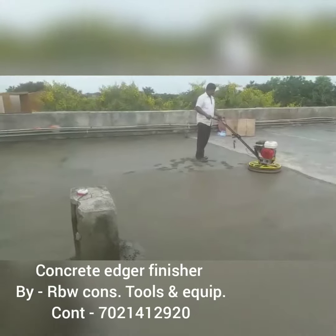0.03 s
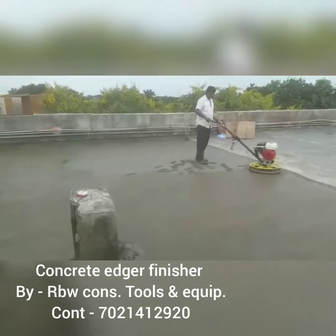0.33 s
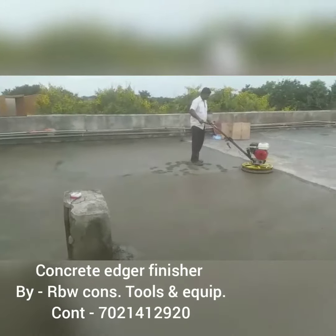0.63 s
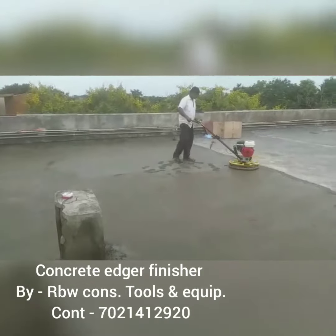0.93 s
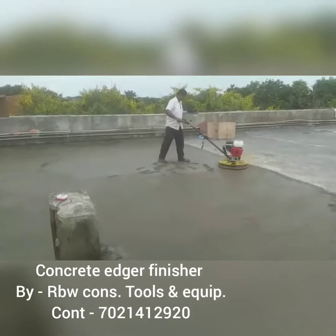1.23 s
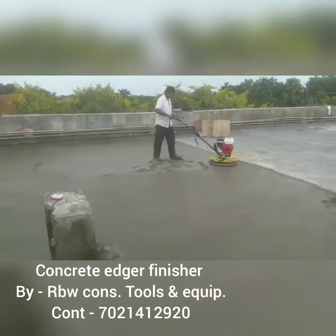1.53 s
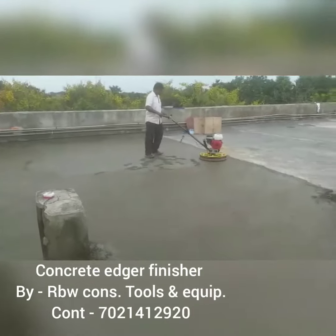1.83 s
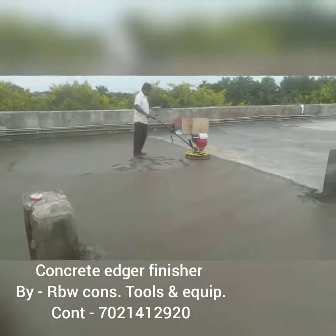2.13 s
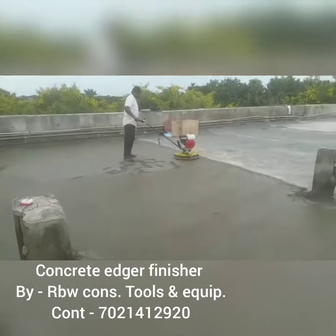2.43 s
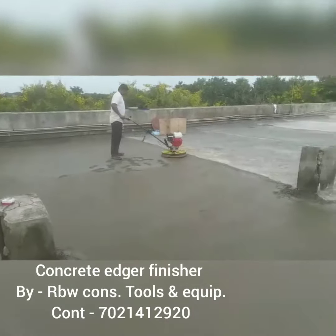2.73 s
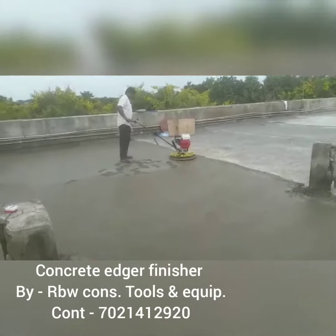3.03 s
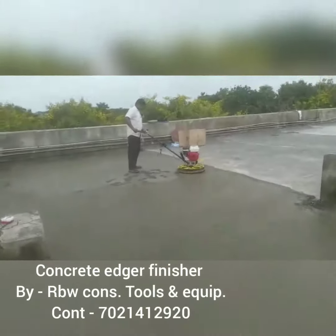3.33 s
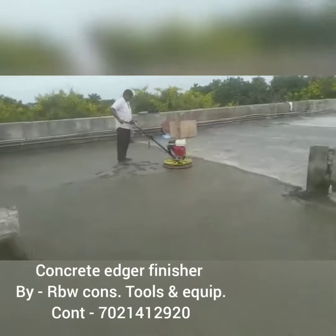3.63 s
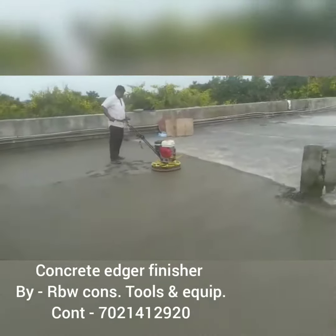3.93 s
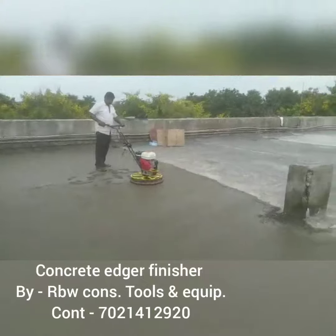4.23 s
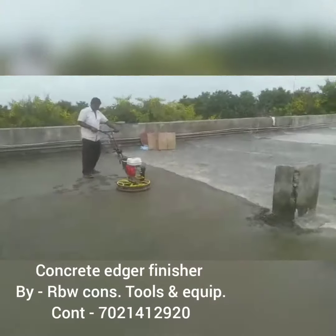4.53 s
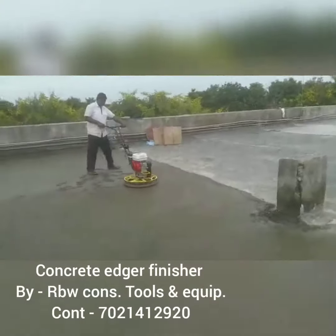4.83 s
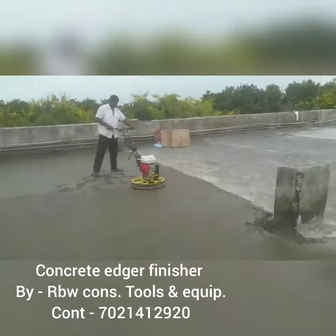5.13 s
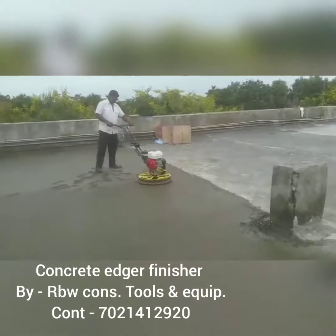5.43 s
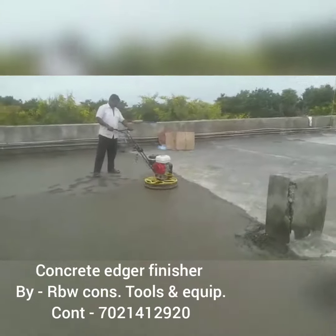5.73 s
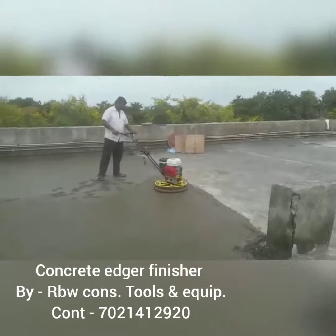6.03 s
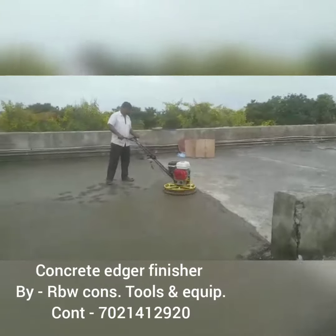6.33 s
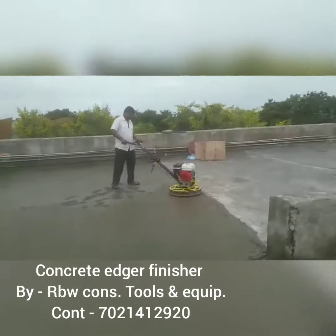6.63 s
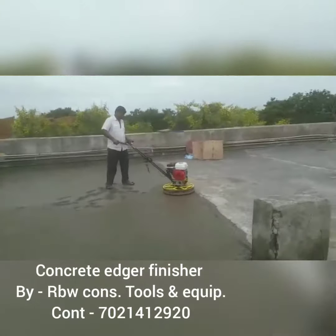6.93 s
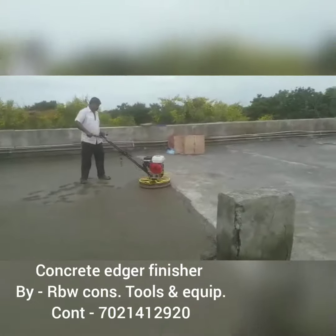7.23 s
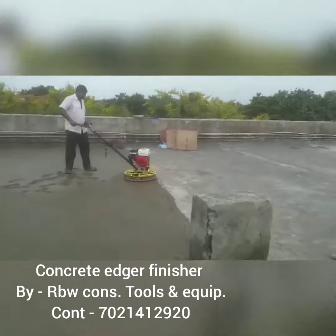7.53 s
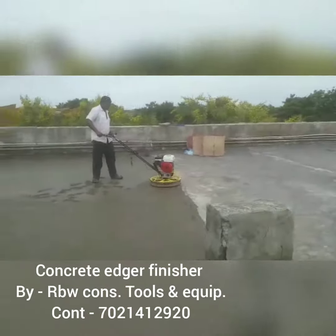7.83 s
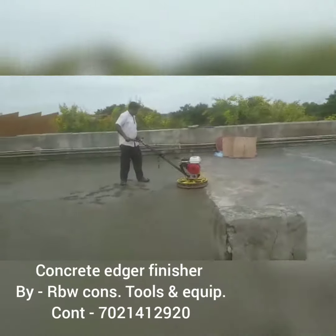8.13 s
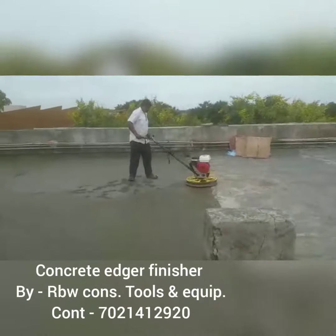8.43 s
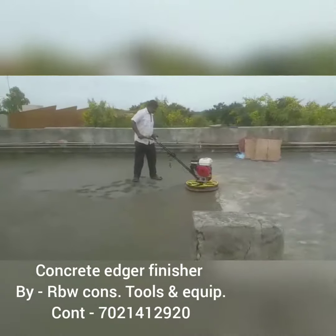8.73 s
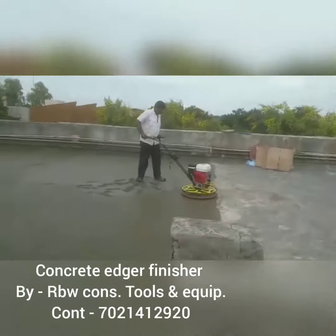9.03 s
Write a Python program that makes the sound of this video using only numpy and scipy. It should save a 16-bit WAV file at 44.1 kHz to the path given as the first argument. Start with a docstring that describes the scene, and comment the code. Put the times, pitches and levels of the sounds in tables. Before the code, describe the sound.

The fast, even thudding of a one-cylinder engine carries across an open rooftop as a power trowel smooths wet concrete a few metres away. Over it comes a continuous sandy grinding and wet hiss from the spinning steel pan. Clusters of small metallic knocks come early, thin out in the middle, then return more thickly before the machine eases slightly. Low walls add a slight reflection.

```python
"""A wet concrete roof with low walls; a walk-behind power trowel works a few metres away.
Its one-cylinder four-stroke engine thuds about 25 times a second, barks harder under load, taps its
casing and rumbles the frame. The steel pan grinds and rings on grit, hisses on the paste and knocks on
stones or the slab's edge. The walls return the thuds; the slab reflects the other sounds."""
import sys
import numpy as np
from scipy import signal
from scipy.fft import rfft, irfft
from scipy.io import wavfile

SR = 44100
rng = np.random.default_rng(int(sys.argv[2]) if len(sys.argv) > 2 else 0)


def dump_mix(stems):
    """Bounce the given channels to the path in sys.argv[1] as a 16-bit WAV at rate SR."""
    frames = np.atleast_2d(stems).T  # one column per channel
    limited = np.clip(frames, -1, 1)  # hard clip at full scale
    pcm = np.round(limited * 32767).astype(np.int16)
    wavfile.write(sys.argv[1], SR, pcm)


N = 405719
TIME = np.arange(N) / SR

# pan's rubbing on the slab: t/s, level/dB
RUB_LEVEL = [(0.0, -21.5), (0.3, -20.5), (0.46, -18), (0.62, -17.5), (0.87, -20.5), (1.04, -23.5),
             (1.09, -26), (1.33, -28), (1.71, -28.5), (2.05, -27.5), (2.17, -24.5), (3.48, -24.5),
             (4.84, -22.5), (5.35, -24), (6.12, -20.5), (6.36, -18), (6.67, -20), (6.73, -20.5),
             (7.0, -22.5), (7.33, -24), (7.56, -24), (7.97, -28.5), (8.79, -27), (9.2, -25.5)]
# modes of steel pan and guard: f/Hz, width/Hz, level/dB
PAN_MODES = [(1950, 850, 2.5), (2350, 1160, 5.5), (2903, 310, 11), (2994, 550, 5), (4105, 230, 7.5),
             (4144, 230, 4.5), (4690, 790, -2.5)]
# rasp of fine sand: f/Hz, level/dB
RASP_SPECTRUM = [(1000, -56), (2500, -10.5), (4000, 1.5), (5000, -0.5), (6000, -1), (7200, -7), (8200, -7),
                 (10000, -16), (15000, -47)]


def from_db(db):
    return 10 ** (np.asarray(db) / 20)


def rms_one(x):
    """Scale the channel mean to rms 1."""
    return x / np.sqrt(np.mean(np.atleast_2d(x).mean(axis=0) ** 2) + 1e-20)


def in_time(rows):
    """One per-sample curve for each column after t/s."""
    t_s, *columns = np.transpose(rows)
    return [np.interp(TIME, t_s, column) for column in columns]


def bump(t_s, length_s):
    """Gaussian, peak 1 at t_s."""
    return np.exp(-np.minimum((2 * (TIME - t_s) / length_s) ** 2, 20))


def drift(rate_hz):
    """Slow random curve, rms 1."""
    step, settle = 40, 2000
    r = np.exp(-2 * step * np.pi * rate_hz / SR)
    noise = rng.standard_normal(N // step + settle + 2)
    slow = signal.lfilter([1], [1, -2 * r, r * r], noise)[settle:]
    return np.interp(np.arange(N) / step, np.arange(len(slow)), rms_one(slow))


def stereo(draw, likeness):
    """Two draws mixed to left and right with correlation `likeness`."""
    return rms_one(np.sqrt(1 + likeness) * draw() + np.sqrt(1 - likeness) * draw() * [[1], [-1]])


def minimum_phase(gains_db):
    """Response of a passive body: sharp start, then ringing."""
    cepstrum = irfft(np.log(from_db(gains_db)))
    half = len(cepstrum) // 2
    return np.exp(rfft(cepstrum * np.r_[1, np.full(half - 1, 2), 1, np.zeros(half - 1)]))


def colour(x, spectrum, bins=2048):
    """Filter by rows of f/Hz, level/dB."""
    hz, db = np.transpose(spectrum)
    grid_hz = np.linspace(1, SR / 2, bins + 1)
    response = irfft(minimum_phase(np.interp(np.log(grid_hz), np.log(hz), db)))
    return signal.oaconvolve(np.atleast_2d(x), response[None], axes=1)[:, :N]


def resonate(x, modes):
    """Parallel resonators, alternating in sign: f/Hz, width/Hz, level/dB."""
    out = 0
    for k, (hz, width_hz, db) in enumerate(modes):
        r = np.exp(-np.pi * width_hz / SR)
        poles = [1, -2 * r * np.cos(2 * np.pi * hz / SR), r * r]
        gain = (-1) ** k * from_db(db) * (1 - r * r) / 2
        out = out + gain * signal.lfilter([1, 0, -1], poles, x + 1e-18)
    return out


def delay(x, lag_s):
    return np.interp(TIME - lag_s, TIME, x)


def stroke(cycles, depth, phase):
    """Gain that peaks once an engine cycle, at `phase` (0-1)."""
    return 1 + depth * np.cos(2 * np.pi * (cycles - phase))


def grit(per_s, spread_db, likeness, clump_db):
    """Tiny random impacts in clumps: many small, a few large."""
    sizes = from_db(spread_db * np.minimum(rng.exponential(1, N), 3.5))
    hits = sizes * (rng.random(N) < per_s / SR)
    return stereo(lambda: hits * rng.uniform(-0.99, 1, N), likeness) * from_db(clump_db * drift(32.5))


def puffs(cycles, harmonics, echo=0.64, echo_cycles=0.235, bins=512):
    """One pressure puff a cycle rings in the silencer, which returns part as a second beat."""
    orders, db = np.transpose(harmonics)
    k = np.arange(bins + 1)
    gains_db = np.interp(k, np.r_[0, orders, 32], np.r_[-45, db, -55])
    late = np.exp(-2j * np.pi * k * echo_cycles)
    allpass = (echo + late) / (1 + echo * late)
    puff = rms_one(irfft(minimum_phase(gains_db) * allpass * (k < 32)))
    return np.interp(cycles % 1, np.arange(2 * bins) / (2 * bins), puff, period=1)


def waver(note, width_hz=28):
    """Narrow bands of the engine note briefly swell or fade."""
    # band swells: t/s, length/s, f/Hz, change/dB
    swells = [(2.5, .4, 185, -15), (3.55, .25, 229, -7), (3.5, .3, 182, -5), (4.5, .5, 231, 2.5),
              (5.1, 0.82, 178, 3.5), (5.05, 0.16, 227, 0), (6.5, 0.65, 140, -17), (6, 0.29, 234, 5.5),
              (5, .5, 337, 4), (6.33, .5, 222, -4.5), (5, 0.5, 295, 9), (6, .3, 247, 3), (7.5, .3, 251, 5),
              (-3, .4, 310, -5)]
    out = note.copy()
    for t_s, length_s, hz, db in swells:
        span = slice(*np.searchsorted(TIME, [t_s - 2 * length_s, t_s + 2 * length_s]))
        mode = [(hz, width_hz, 0)]
        band = resonate(resonate(note[span], mode)[::-1], mode)[::-1]   # zero phase
        out[span] += band * (from_db(db) - 1) * bump(t_s, length_s)[span]
    return out


def exhaust(cycles, light_db=-30, loaded_db=-25, note_db=-1, uneven_db=0.6, rumble_db=-16):
    """Load turns a soft thud into a bark; firings vary in strength and the frame rumbles along."""
    # engine effort: t/s, level/dB
    effort = [(0.0, -23.5), (0.59, -24), (1.28, -30.5), (1.87, -32), (2.12, -27), (3.41, -26.5),
              (4.25, -25), (5.12, -27.5), (6.3, -23.5), (6.48, -27), (6.97, -28), (7.17, -33), (7.48, -31),
              (7.99, -32), (8.38, -29), (9.2, -32.5)]
    # note running light: multiple of firing rate, level/dB
    light = [(1, -34), (2, -23), (3, -18.5), (4, -5.5), (5, -2.5), (6, 3.5), (7, -4), (8, -5), (9, -1.5),
             (10, 0.5), (11, -5.5), (12, -11), (13, -12), (14, -10), (15, -13.5), (16, -24), (17, -24),
             (18, -35.5)]
    # note under load: multiple of firing rate, level/dB
    loaded = [(1, -39), (2, -19), (3, -16), (4, -9), (5, -1.5), (6, -2.5), (7, 0), (8, -7.5), (9, 5),
              (10, -1.5), (11, -3.5), (12, -4.5), (13, -6.5), (14, -9.5), (15, -11), (16, -17.5), (17, -26),
              (18, -28.5)]
    # frame rumble: f/Hz, level/dB
    rumble_spectrum = [(15, -12), (35, -14), (70, -8), (120, -2), (250, -2.5), (380, -3.5), (550, -18),
                       (1200, -37)]
    (level_db,), (rub_db,) = in_time(effort), in_time(RUB_LEVEL)
    load = np.clip((level_db - light_db) / (loaded_db - light_db), 0, 1)
    note = (1 - load) * puffs(cycles, light) + load * puffs(cycles, loaded)
    note = waver(note) * from_db(note_db + uneven_db * drift(7.9))
    rumble = rms_one(colour(stereo(lambda: rng.standard_normal(N), likeness=0.95), rumble_spectrum))
    rumble *= from_db(rumble_db + 0.6 * (rub_db - level_db))   # partly follows the rubbing
    return from_db(level_db) * (note + rumble) * stroke(cycles, depth=0.097 * load, phase=0.15)


def clatter(cycles, level_db=-39, decay_cycles=0.37):
    """Valves and piston tap the casing at the same points of every cycle."""
    # taps: phase/cycles, level/dB
    taps = [(.05, 11), (.29, -16), (.55, 0), (.84, -9)]
    # casing response: f/Hz, level/dB
    casing = [(100, -40), (450, -1.5), (850, -7), (1200, 0.5), (1550, 1.5), (2050, 5), (2700, -4.5),
              (4300, -11), (7000, -11), (10000, -12), (15000, -14)]
    envelope = sum(from_db(db) * np.exp(-((cycles - phase) % 1) / decay_cycles) for phase, db in taps)
    impacts = envelope * grit(12000, spread_db=1, likeness=0.23, clump_db=4)
    return from_db(level_db) * rms_one(colour(impacts, casing))


def patches_db():
    """Rubbing swells over patches of grit and drops where the pan lifts."""
    # patches and lifts: t/s, length/s, change/dB
    patches = [(0.562, 0.07, 1.5), (2.11, 0.18, 5.5), (2.258, 0.09, 3.5), (6.797, 0.054, -1),
               (6.897, 0.17, 2.5), (7.25, 0.11, 1), (7.362, 0.053, -2.5), (7.43, 0.044, 3.5),
               (7.543, 0.16, 2), (7.622, 0.023, -1), (8.982, 0.11, 2)]
    return sum(db * bump(t_s, length_s) for t_s, length_s, db in patches)


def rubbing(cycles, judder_db=0.5, grind_db=-9, scrape_db=-3, rasp_db=-8, hiss_db=-16):
    """Each stroke presses the juddering pan down: coarse sand grinds, fine rasps, wet paste hisses."""
    # ground under the pan: t/s, coarseness/dB, wet paste/dB
    ground = [(0, -0.5, -2), (1, -3, -6), (2.6, 0.5, 1.5), (3.4, 0.5, -.5), (4.1, 0, -2), (4.5, -1, 2.5),
              (6.3, -0.5, 1), (7, 3, -2.5), (7.6, 0.5, 0), (8.1, 0.5, -1.5), (9.2, -2, -3)]
    # low grind: f/Hz, level/dB
    grind_spectrum = [(50, -42), (250, -5.5), (410, -3), (580, -8), (800, -1), (1150, -1), (1420, -2),
                      (1750, 1), (2300, -10), (3500, -46.5)]
    # sand scrape: f/Hz, level/dB
    scrape_spectrum = [(400, -62), (1000, -17), (1600, -8.5), (1950, -1), (2600, 4), (3300, 4), (4400, 1),
                       (5000, -8), (6000, -33), (9000, -42), (14000, -53)]
    # paste hiss: f/Hz, level/dB
    hiss_spectrum = [(2000, -36), (5000, 4.5), (7500, -16), (9000, 1.5), (10200, 2), (11500, 2),
                     (12700, -2), (15000, -12), (16000, -23)]
    coarse_db, paste_db = in_time(ground)
    level_db = in_time(RUB_LEVEL)[0] + patches_db() + judder_db * drift(32)
    pressure = from_db(level_db) * stroke(cycles, depth=0.0044, phase=0.2)
    grind = rms_one(colour(grit(6000, spread_db=2, likeness=0.84, clump_db=1.13), grind_spectrum))
    steel = rms_one(resonate(grit(1500, spread_db=0.5, likeness=0.96, clump_db=-2.5), PAN_MODES))
    sand = rms_one(colour(grit(7000, spread_db=0.5, likeness=0.61, clump_db=1.37), scrape_spectrum))
    rasp = rms_one(colour(grit(10000, spread_db=-2.5, likeness=0.16, clump_db=1), RASP_SPECTRUM))
    hiss = rms_one(colour(grit(20000, spread_db=3.5, likeness=0.044, clump_db=1.4), hiss_spectrum))
    return pressure * (from_db(grind_db + 0.48 * coarse_db) * grind
                       + from_db(scrape_db + 0.1 * coarse_db) * rms_one(sand + 0.69 * steel)
                       + from_db(rasp_db - coarse_db) * rasp
                       + from_db(hiss_db + paste_db - 0.63 * coarse_db) * hiss)


def ringing(cycles, width_hz=210, fade_s=0.13, gain_db=-1):
    """Grit excites resonances that glide as the contact wanders round the pan."""
    # pan and frame resonances: start/s, end/s, first f/Hz, last f/Hz, level/dB
    glides = [(0.5, 0.9, 3740, 3300, -28), (.35, 1.07, 4450, 4400, -30.5), (-0.1, 1.56, 2150, 2040, -38),
              (0, 0.87, 630, 660, -42), (0.8, 0.76, 1300, 1200, -36), (2, 2.95, 3020, 2930, -36.5),
              (2.5, 3.1, 4200, 4130, -32), (2.5, 3.8, 2710, 2700, -36), (3.5, 4.5, 3520, 3500, -33.5),
              (4.5, 6.2, 3320, 3280, -33.5), (4.5, 5.7, 3760, 3950, -30), (5.5, 5.65, 4650, 4560, -31),
              (5.5, 6.4, 4470, 4380, -30.5), (6.5, 7.5, 4480, 4500, -33), (5.6, 6.2, 3550, 3900, -31.5),
              (4.5, 6.2, 2350, 2330, -35.5), (6, 7.3, 3400, 3900, -36), (6.5, 7.3, 2260, 2450, -30.5),
              (6.5, 7.5, 3230, 3280, -31), (6.4, 7.4, 1070, 880, -36), (6.9, 7.75, 350, 360, -40.5),
              (7.5, 8.8, 4250, 4100, -37.5), (8.5, 9.3, 4500, 4200, -32.5), (8, 9.3, 3280, 3280, -36),
              (8.5, 9.3, 5080, 5080, -39), (4.6, 7, 1670, 1720, -41.5), (5, 6.1, 1170, 1180, -43)]
    grains = grit(800, spread_db=3.2, likeness=0.61, clump_db=2.3)
    grains *= stroke(cycles, depth=0.1, phase=0.32)
    r = np.exp(-np.pi * width_hz / SR)
    out = np.zeros((2, N))
    for start_s, end_s, first_hz, last_hz, db in glides:
        span = slice(*np.searchsorted(TIME, [start_s - fade_s / 2, end_s + fade_s / 2]))
        t = TIME[span]
        hz = np.interp(t, [start_s, end_s], [first_hz, last_hz])
        carrier = np.exp(2j * np.pi * np.cumsum(hz) / SR)
        baseband = signal.lfilter([1], [1, -2 * r, r * r], grains[:, span] / carrier + 1e-18)
        touch = np.clip(np.minimum(t - start_s, end_s - t) / fade_s + 0.5, 0, 1)
        out[:, span] += from_db(db + gain_db) * touch * rms_one((carrier * baseband).real)
    return out * from_db(patches_db())


def blows(rebound_s=0.018, rebound_db=-4, strays_per_s=1.8, stray_db=-13):
    """Big knocks, their rebounds a crank turn later, and small random ones from stray grains."""
    # pan strikes: t/s, level/dB, clunk re ring/dB, f of struck spot/Hz
    strikes = [(0.5738, -10, -8, 4040), (0.619, -10, -23, 2920), (0.729, -15, -26, 3680),
               (0.747, -20, -22, 3650), (0.806, -12, -26, 3780), (0.831, -13.5, -12, 4400),
               (1.0122, -13.5, -14, 2230), (1.03, -19, -13, 3760), (2.0183, -13, -14, 3060),
               (2.032, -22, -15, 2970), (2.099, -17.5, -3, 2700), (2.17, -20, -9, 2950),
               (2.2573, -14, -9, 2740), (2.267, -13, -11, 2780), (2.427, -15.5, -13, 2960),
               (2.604, -16.5, -21, 4160), (2.733, -17, -16, 4200), (3.0373, -15, -25, 4150),
               (3.0598, -13.5, -24, 3000), (3.178, -16, -19, 2680), (3.2177, -14, -16, 2620),
               (3.238, -19, -20, 2860), (3.586, -15.5, -10, 4140), (4.199, -11.5, -10, 3800),
               (5.717, -16, -16, 3400), (6.225, -15, -10, 3300), (6.2868, -10.5, -8, 2090),
               (6.3117, -10.5, -12, 4250), (6.34, -17, -13, 3300), (6.3777, -18, -13, 2560),
               (6.412, -13.5, -5.5, 3210), (6.443, -10.5, -8, 2260), (6.4945, -17.5, 2, 3870),
               (6.526, -13.5, -10, 3230), (6.566, -12.5, -5.5, 3750), (6.5932, -15, -15, 2470),
               (6.606, -22, -19, 2920), (6.624, -17.5, 1, 3450), (6.649, -15, -14, 3700),
               (6.668, -15, -18, 3290), (6.7743, -15, -22, 2800), (6.822, -23, 0, 2600),
               (6.8377, -28, 7.5, 2680), (6.892, -13, -12, 3820), (6.932, -13, -14, 3250),
               (6.981, -16, -8, 3320), (7.035, -14.5, -22, 3200), (7.138, -11, -9.5, 3170),
               (7.211, -16, -6, 2400), (7.2317, -18, -22, 3270), (7.2432, -10.5, -24, 3330),
               (7.3856, -13.5, -10.5, 3620), (7.41, -13, -15, 2560), (7.432, -15, -16, 3340),
               (7.5386, -16, -19, 3400), (7.5665, -16, -13, 3360), (7.673, -23, 1.5, 3350),
               (7.72, -8.5, -9, 3000), (7.752, -17.5, -10, 3100), (8.005, -21, -19, 3120),
               (8.298, -20.5, -9, 3230), (8.3564, -12, -4, 3130), (8.481, -18.5, -4.5, 3620),
               (8.519, -21, -8, 3230), (8.578, -21.5, -6, 3500), (8.667, -23, -14, 3050),
               (8.947, -20, -17, 2670), (9.038, -18, -18, 4220), (9.182, -13, -14, 3200)]
    rebounds = [(t_s + rebound_s, db + rebound_db + 0.53 * clunk_db, clunk_db, hz)   # clunks rebound most
                for t_s, db, clunk_db, hz in strikes]
    chance = rng.random((60, 2))
    times_s = np.cumsum(-np.log(1 - chance[:, 0])) / strays_per_s
    strays = [(t_s, np.interp(t_s, *np.transpose(RUB_LEVEL)) + stray_db, -11, 2600 + 1600 * spot)
              for t_s, spot in zip(times_s, chance[:, 1])]
    return [row for row in list(strikes) + rebounds + strays if row[0] < TIME[-1]]


def knocks(gain_db=-2.5, rise_s=0.00044, chatter_s=0.011, clink_s=0.0051):
    """Steel chatters on stone: light touches clink one spot, heavy ones ring the whole pan and frame."""
    frame_modes = [(793, 200, 8.6), (1130, 210, 8.2), (1610, 330, 7.5)]   # f/Hz, width/Hz, level/dB
    pan_force, frame_force, clinks = np.zeros((3, N))
    age_s = TIME[:SR // 8]
    attack = 1 - np.exp(-age_s / rise_s)
    for t_s, db, clunk_db, hz in blows():
        at = int(t_s * SR)
        span = slice(at, at + len(age_s))
        blow = from_db(db) * attack
        burst = (blow * np.exp(-age_s / chatter_s))[:N - at]
        clink = (blow * np.exp(-age_s / clink_s) * np.sin(2 * np.pi * hz * age_s))[:N - at]
        pan_force[span] += burst * from_db(2 + 0.5 * clunk_db)
        frame_force[span] += burst * from_db(clunk_db)
        clinks[span] += clink * from_db(-0.23 * (clunk_db + 10.5))
    contact = stereo(lambda: rng.standard_normal(N), likeness=0.76)
    ring = resonate(contact * pan_force, PAN_MODES) / np.std(resonate(contact, PAN_MODES))
    snap = colour(contact * pan_force, RASP_SPECTRUM) / np.std(colour(contact, RASP_SPECTRUM))
    clunk = resonate(contact * frame_force, frame_modes) / np.std(resonate(contact, frame_modes))
    return from_db(gain_db) * (ring + 0.43 * snap + 1.77 * clinks + from_db(-1) * clunk)


def parapet(x, far_gain=0.19, near_gain=0.26, skew_s=0.00013):
    """Two low walls return the thuds; as their lags shift, single harmonics swell and cancel."""
    # wall echoes: t/s, far lag/s, near lag/s
    wall_lags = [(0.0, 0.03774, 0.02365), (0.6, 0.03791, 0.02585), (1.1, 0.03707, 0.02552),
                 (1.6, 0.03607, 0.02471), (2.2, 0.03367, 0.0228), (2.8, 0.033, 0.02227),
                 (3.4, 0.03273, 0.02015), (3.9, 0.02991, 0.01985), (4.4, 0.03026, 0.0186),
                 (5.0, 0.02986, 0.01707), (5.6, 0.02937, 0.01498), (6.2, 0.02787, 0.01292),
                 (6.7, 0.02618, 0.01289), (7.1, 0.02511, 0.01297), (7.6, 0.02362, 0.01387),
                 (8.4, 0.02202, 0.01595), (9.2, 0.01984, 0.01587)]
    far_s, near_s = in_time(wall_lags)
    heard = [side + far_gain * delay(side, far_s + late_s) + near_gain * delay(side, near_s - late_s)
             for side, late_s in zip(x, (-skew_s, skew_s))]
    return np.vstack(heard) * from_db([[0.3], [-0.3]])


def bounce(x, lag_s, rim_gain=0.46, rim_s=0.00025):
    """Slab reflection, trailed by an inverted one from the pan's rim."""
    return delay(x, lag_s) - rim_gain * delay(x, lag_s + rim_s)


def rooftop(x):
    """Direct sound plus slab bounce; the left side is later and has more treble."""
    # paths from the moving machine: t/s, left bounce lag/s, right bounce lag/s, left side lag/s
    path_lags = [(0, 0.00084, 0.00115, 0.00022), (1.5, .00088, .00114, 0.00016),
                 (2.6, .001, .00112, 0.00011), (3.4, .00105, .00108, .0001),
                 (4.3, 0.00083, .00104, 0.000021), (5.5, 0.00088, 0.0012, .00003),
                 (6.5, 0.000935, 0.00119, 0.0000854), (7.5, .0009, .00106, 0.000018),
                 (8.2, .00098, .0011, .00008), (9.2, 0.00099, 0.00116, 0.00012)]
    # stereo balance: f/Hz, left minus right/dB
    balance = [(500, -0.7), (800, 0), (1200, 2), (1800, 0), (2700, 6.5), (4200, 10), (6400, 5.5), (9800, 9),
               (14000, 2)]
    left_s, right_s, side_s = in_time(path_lags)
    left = delay(x[0], side_s) + 0.14 * bounce(x[0], side_s + left_s)
    right = x[1] + 0.13 * bounce(x[1], right_s)
    return np.vstack([colour(left, [(hz, db / 2) for hz, db in balance]),
                      colour(right, [(hz, -db / 2) for hz, db in balance])])


def scene(start_cycles=0.1033, wobble_cycles=0.0024):
    """The uneven crank drives exhaust, clatter and the shaking of the pan."""
    # engine speed, hunting round the governor's setting: t/s, firing rate/Hz
    speed = [(0.0, 25.727), (1.04, 24.627), (1.36, 25.796), (2.0, 24.864), (3.16, 25.653), (3.32, 25.075),
             (3.92, 26.369), (4.32, 25.384), (4.48, 25.724), (5.04, 25.047), (5.6, 26.028), (6.32, 24.376),
             (6.68, 25.539), (6.96, 25.618), (7.36, 24.905), (7.68, 25.705), (7.84, 25.284), (8.16, 26.039),
             (8.72, 25.222), (9.2, 25.106)]
    cycles = start_cycles + np.cumsum(in_time(speed)[0]) / SR + wobble_cycles * drift(24)
    thuds = parapet(exhaust(cycles))
    return thuds + rooftop(clatter(cycles) + rubbing(cycles) + ringing(cycles) + knocks())


def record(dry, ceiling=0.95, cutoff_hz=15500):
    """Soft clip, then a steep low-pass."""
    rounded = dry / (1 + (dry / ceiling) ** 6) ** (1 / 6)
    return signal.sosfilt(signal.ellip(10, 0.1, 80, cutoff_hz, fs=SR, output="sos"), rounded)


dry = scene()
out = record(dry)
dump_mix(out)
```